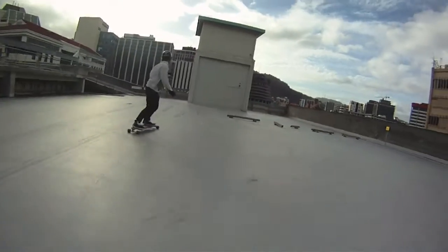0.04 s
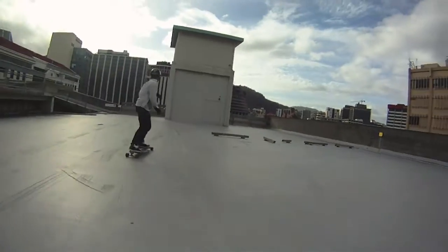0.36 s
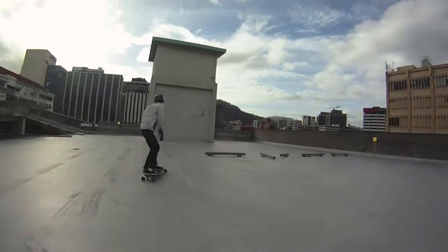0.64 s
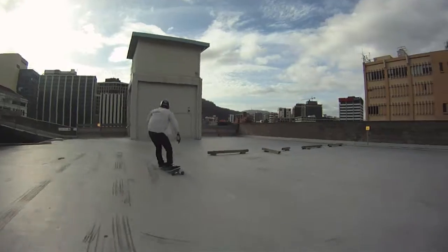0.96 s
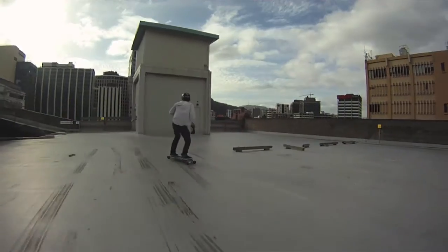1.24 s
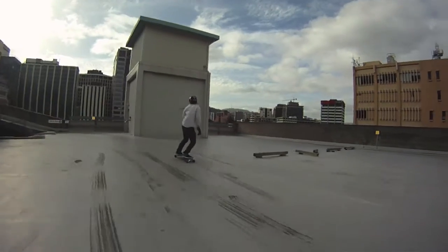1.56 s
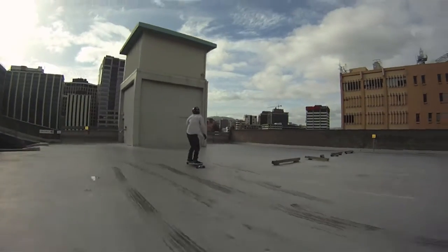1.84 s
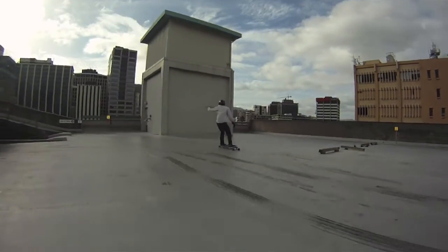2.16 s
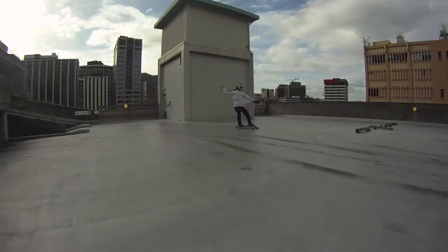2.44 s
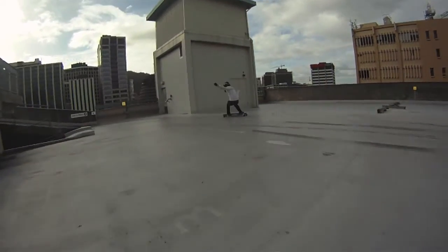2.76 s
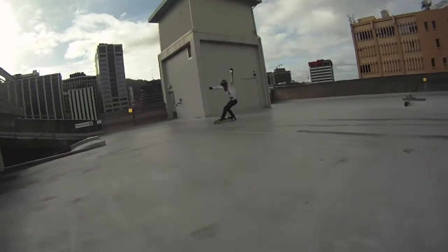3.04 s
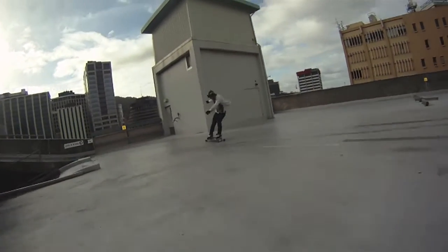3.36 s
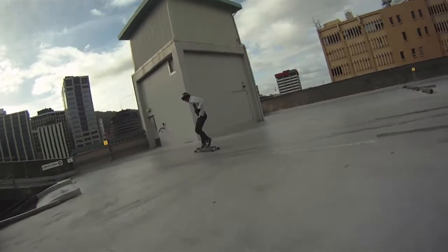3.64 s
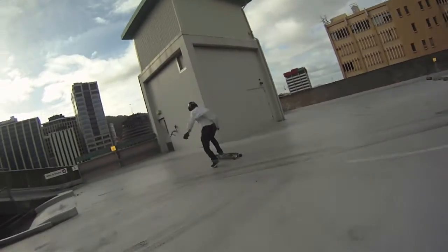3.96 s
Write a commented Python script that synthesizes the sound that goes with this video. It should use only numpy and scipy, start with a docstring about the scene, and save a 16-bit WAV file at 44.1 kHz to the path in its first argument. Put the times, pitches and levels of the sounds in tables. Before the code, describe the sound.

A skateboard rolls on smooth concrete with a steady rumble and gritty hiss, while wind buffets the following microphone. The board rattles briefly and the wheels hum during the first second. From about 2 seconds they scrub lightly, with a few faint knocks. At 3 seconds comes a loud sideways scrape with juddering and short squeals, fading by about 3.6 seconds into quieter rolling and a small knock.

```python
"""Longboard slide on a rooftop

A smooth concrete parking deck, heard in mono from a camera microphone riding behind on a second board.
The ground shakes the boards and rings the wheels into a rumble and hum, with grit hissing underneath.
The rider leans into a carve, then throws the board sideways at about 3 s: the urethane sticks and slips,
so it scrapes, chatters and briefly squeals before it grips again. Wind buffets the microphone."""
import sys
import numpy as np
from scipy import signal
from scipy.fft import rfft, irfft
from scipy.io import wavfile
from scipy.ndimage import uniform_filter1d

SR = 44100
rng = np.random.default_rng(int(sys.argv[2]) if len(sys.argv) > 2 else 0)


def wrap_up_sound(samples):
    """Save the sound to the file named by the first command line argument, as 16-bit audio."""
    columns = np.atleast_2d(samples).T
    # keep every value between -1 and 1, then stretch to whole-number steps
    tamed = np.clip(columns, -1, 1)
    steps = np.round(tamed * 32767).astype(np.int16)
    wavfile.write(sys.argv[1], SR, steps)


N = 176400
T = np.arange(N) / SR

# boards shaking on the concrete: (time [s], level [dB])
RUMBLE_LEVEL = [(0, -33.5), (.3, -30), (.55, -29), (.67, -30.5), (.8, -31.5), (1.05, -29), (1.3, -30.5),
                (1.46, -30), (1.68, -35), (1.9, -34), (2.05, -35.5), (2.2, -32), (2.4, -30.5), (2.65, -32),
                (2.85, -28), (2.96, -32), (3.1, -26.5), (3.3, -27), (3.4, -38.5), (3.65, -35), (4, -32)]
# tone of that rumble: (frequency [Hz], relative level [dB])
RUMBLE_TONE = [(40, -20), (75, -14), (100, -2.5), (130, 3.5), (165, 1), (225, -0.5), (265, -1), (325, -5.5),
               (380, -6), (445, -5), (540, -8.5), (650, -15), (900, -33), (2000, -45), (6000, -87)]
# hollow hum of the rolling wheels: (time [s], level [dB])
HUM_LEVEL = [(0, -31.5), (.45, -30), (.9, -34), (1.15, -35.5), (1.4, -39.5), (1.6, -35.5), (1.85, -33),
             (2.05, -38), (2.3, -37.5), (2.6, -38), (2.9, -39), (3.05, -35.5), (3.25, -25.5), (3.37, -30),
             (3.46, -27.5), (3.57, -34), (3.75, -36), (4, -35.5)]
# wheel resonances in the hum: (frequency [Hz], width [Hz], relative gain [dB])
WHEEL_MODES = [(436, 46, -5), (492.6, 52, -1.5), (546.7, 56, -3)]
# grit under the wheels: (time [s], level [dB])
HISS_LEVEL = [(0, -44.5), (.25, -46), (.55, -45), (1, -47), (1.15, -46), (1.7, -48), (2, -47), (3, -46),
              (3.55, -45), (3.72, -45), (3.85, -45.5), (4, -45.5)]
# tone of the grit: (frequency [Hz], relative level [dB])
HISS_TONE = [(300, -39), (650, 2.5), (800, 3.5), (1000, 1.5), (1270, 0), (1420, 1), (1650, 0.5),
             (1950, -3.5), (2250, -0.5), (2480, -1.5), (2850, 1.5), (3250, -0.5), (3550, -8), (3850, -6),
             (4300, -10), (4900, -8.5), (5300, -14), (5700, -20)]
# wheels singing on one note at speed: (time [s], level [dB])
SING_LEVEL = [(0, -32), (.15, -30), (.3, -30.5), (.38, -29.5), (.43, -24.5), (.52, -25.5), (.59, -31.5),
              (.65, -40), (.72, -29.5), (.79, -28.5), (.86, -29.5), (.93, -49), (1.2, -40), (1.5, -37),
              (1.85, -41), (2, -52), (3, -41), (3.18, -26.5), (3.25, -26.5), (3.32, -54), (4, -65)]
# drone of the flexing board: (time [s], level [dB])
DRONE_LEVEL = [(0, -39), (.6, -52), (.8, -35), (1.03, -31), (1.15, -32.5), (1.6, -34.5), (1.9, -34.5),
               (2.1, -39.5), (2.8, -35), (3.05, -36), (3.4, -36.5), (4, -51)]
# thin whirr of the bearings: (time [s], level [dB])
WHIRR_LEVEL = [(0, -57), (.7, -71), (.9, -51), (1.3, -67), (1.55, -54), (1.9, -55), (2.1, -59), (2.5, -59),
               (3, -49.5), (4, -53)]

# wheels scrubbing lightly in the carve: (time [s], level [dB])
SCRUB_LEVEL = [(0, -84), (1.9, -60), (2.15, -47.5), (2.3, -45), (2.45, -46), (2.65, -44.5), (2.85, -45),
               (3.03, -48.5), (3.15, -55), (4, -73)]
# wheel and truck resonances in the carve: (frequency [Hz], width [Hz], relative gain [dB])
CARVE_MODES = [(1260, 130, -1), (1626, 94, 2.5), (2125, 230, -0.5), (2746, 230, 1.5), (3150, 390, 0.5),
               (4900, 330, -11.5)]
# wheels scraping sideways in the slide: (time [s], level [dB])
SCRAPE_LEVEL = [(2.9, -75), (3.03, -45), (3.08, -31.5), (3.13, -32.5), (3.18, -29), (3.27, -28),
                (3.33, -29.5), (3.39, -33.5), (3.47, -31.5), (3.53, -37), (3.62, -50.5), (3.72, -41),
                (3.82, -58), (4, -66)]
# tone of urethane slipping on concrete: (frequency [Hz], relative level [dB])
SCRAPE_TONE = [(150, -19), (330, -7), (550, 6), (830, 2.5), (1100, -1.5), (1330, 5), (1520, 0), (1720, 2.5),
               (1920, -2), (2170, 5), (2480, 2.5), (2920, 7), (3300, 2), (3550, -3), (4000, -12.5),
               (4350, -10), (4850, -7.5), (5400, -12.5), (6000, -20)]
# tone of the board shaken by the slide: (frequency [Hz], relative level [dB])
SHAKE_TONE = [(60, -17), (118, 4), (160, -10.5), (205, -0.5), (270, 4), (320, -24), (600, -43), (3000, -80)]
# stick-slip of the sliding wheels: (time [s], rate [Hz], fundamental level [dB], octave level [dB])
CHATTER_TRACK = [(3.04, 245.6, -50, -41), (3.09, 243.7, -23, -35), (3.16, 245.3, -20, -30),
                 (3.2, 249.6, -37, -26), (3.247, 245.3, -24.5, -20.5), (3.285, 242.4, -23, -21),
                 (3.319, 242.9, -33, -24.5), (3.379, 222.6, -44, -31), (3.42, 214.6, -33, -21.5),
                 (3.46, 214.5, -29.5, -24.5), (3.5, 212.6, -30.5, -30), (3.6, 219, -35, -44),
                 (3.8, 220, -42, -48), (3.98, 213.5, -47, -55)]
# squeals of a single wheel: (centre time [s], half-length [s], pitch [Hz], level [dB])
WHEEL_SQUEALS = [(3.107, 0.08, 2087, -33.5), (3.212, 0.06, 814, -31.5), (3.19, 0.079, 2907, -31.5),
                 (3.286, 0.11, 1347, -36.5), (3.301, 0.17, 2730, -39), (3.455, 0.034, 885, -36.5)]

# the board rattling at the start: (time [s], level [dB])
RATTLE_LEVEL = [(0, -34), (.17, -32.5), (.32, -32), (.45, -39), (.6, -50), (1, -80)]
# resonances of board and hardware: (frequency [Hz], width [Hz], relative gain [dB])
HARDWARE_MODES = [(279, 74, -2.5), (680, 280, -16.5), (1580, 160, -22.5), (2270, 390, -33),
                  (2750, 120, -26)]
# knocks on the trucks: (time [s], relative level [dB])
TRUCK_KNOCKS = [(.16, -26), (.229, -31), (.298, -37), (2.008, -28), (2.335, -31), (2.437, -24),
                (3.918, -18.5)]
# truck resonances: (frequency [Hz], width [Hz], relative gain [dB])
TRUCK_MODES = [(1430, 420, -12), (2350, 310, -8), (2980, 310, -3.5)]
# single grains cracking under a wheel: (time [s], relative level [dB])
GRIT_CRACKS = [(.16, -44), (.81, -42), (1.65, -37.5), (1.741, -41)]
# gusts on the microphone: (time [s], relative level [dB])
WIND_LEVEL = [(0.0, -44), (0.31, -38), (0.37, -27.5), (0.42, -31.5), (0.56, -25), (0.58, -29.5),
              (0.72, -29.5), (0.77, -37.5), (1.08, -24), (1.11, -38), (1.22, -24.5), (1.26, -39),
              (1.37, -27), (1.4, -37), (1.46, -26.5), (1.55, -38), (1.6, -29), (1.7, -44), (1.96, -45),
              (2.03, -23), (2.1, -38.5), (2.21, -31.5), (2.24, -43), (2.37, -36), (2.41, -31),
              (2.49, -33.5), (2.55, -31.5), (2.62, -38), (2.87, -33.5), (2.9, -23), (2.96, -54),
              (3.01, -28.5), (3.45, -46.5), (3.84, -47), (3.87, -39), (4.0, -54)]
# tone of the buffeting: (frequency [Hz], relative level [dB])
WIND_TONE = [(15, 0), (28, -0.5), (55, 3), (85, 0.5), (130, -7), (220, -26.5), (500, -54), (3000, -95)]


def from_db(db):
    """Decibels to gain."""
    return 10 ** (np.asarray(db) / 20)


def rms_one(x):
    """Scale to rms 1."""
    return x / np.sqrt(np.mean(x ** 2) + 1e-20)


def level(rows):
    """Gain over time from (time [s], level [dB]) rows."""
    return from_db(np.interp(T, *np.transpose(rows)))


def drift(rate_hz):
    """Random wander of rms about 1, mostly slower than rate_hz."""
    step, settle = 40, 2000
    pole = np.exp(-2 * np.pi * rate_hz * step / SR)
    noise = rng.standard_normal(N // step + settle + 2)
    slow = signal.lfilter([1], [1, -2 * pole, pole * pole], noise)[settle:]
    return np.interp(np.arange(N) / step, np.arange(len(slow)), rms_one(slow))


def coloured(x, spectrum):
    """Filter x by (frequency [Hz], relative level [dB]) points; rms 1."""
    hz, db = np.transpose(spectrum)
    bins = np.maximum(np.fft.rfftfreq(N, 1 / SR), 1)
    gain = from_db(np.interp(np.log(bins), np.log(hz), db))
    return rms_one(irfft(rfft(x) * gain, N))


def steadied(x, span_s):
    """Even out the swells of x that are slower than span_s; rms about 1."""
    return x / np.sqrt(uniform_filter1d(x ** 2, int(span_s * SR)) + 1e-9)


def resonate(x, hz, width_hz):
    """One resonance with gain 1 at its peak."""
    r = np.exp(-np.pi * width_hz / SR)
    feedback = [1, -2 * r * np.cos(2 * np.pi * hz / SR), r * r]
    return signal.lfilter(np.array([1, 0, -1]) * (1 - r * r) / 2, feedback, x + 1e-18)


def body(x, modes):
    """Pass x through parallel resonances of alternating sign."""
    return sum((-1) ** k * from_db(db) * resonate(x, hz, width) for k, (hz, width, db) in enumerate(modes))


def note(hz, width_hz, span_s):
    """A steep-sided resonance kept ringing by the ground; rms about 1."""
    ring = resonate(rng.standard_normal(N), hz, width_hz)
    return steadied(resonate(ring, hz, 3 * width_hz), span_s)


def softened(x, hz):
    """Round off the treble, as a soft contact does."""
    return signal.sosfilt(signal.butter(4, hz, fs=SR, output="sos"), x)


def grains(per_s, spread_db):
    """Tiny impacts at random times; spread_db makes their sizes uneven."""
    sizes = from_db(spread_db * np.minimum(rng.exponential(1, N), 6)) * rng.choice([-1, 1], N)
    return sizes * (rng.random(N) < per_s / SR)


def bursts(rows, decay_s):
    """A dying burst of noise at each (time [s], level [dB]) row."""
    envelope = sum(from_db(db) * (T >= s) * np.exp(-np.abs(T - s) / decay_s) for s, db in rows)
    return envelope * rng.standard_normal(N)


def rolling():
    """The grain of the concrete shakes the boards and rings the wheels; grit hisses under them."""
    rumble = steadied(coloured(rng.standard_normal(N), RUMBLE_TONE), span_s=0.079)
    rings = sum(from_db(db) * resonate(rng.standard_normal(N), hz, width) for hz, width, db in WHEEL_MODES)
    hum = steadied(coloured(rings, [(200, 1), (400, -2), (600, -7), (800, -13), (4000, -68)]), span_s=0.1)
    hiss = coloured(grains(per_s=5000, spread_db=0), HISS_TONE)
    flutter = from_db(0.52 * drift(rate_hz=21))
    return level(RUMBLE_LEVEL) * rumble + level(HUM_LEVEL) * hum + level(HISS_LEVEL) * hiss * flutter


def slide_scrape():
    """Dense tiny slips of urethane on concrete; they also shake the board, most of all in the bass."""
    slips = grains(per_s=4000, spread_db=1) * from_db(0.84 * drift(rate_hz=32))
    shaking = steadied(coloured(rng.standard_normal(N), SHAKE_TONE), span_s=0.06)
    return level(SCRAPE_LEVEL) * (coloured(slips, SCRAPE_TONE) + shaking)


def slide_chatter():
    """The wheels stick and slip unevenly, more slowly as the board loses speed: a judder and its octave."""
    times, hz, *partial_dbs = np.transpose(CHATTER_TRACK)
    slip_hz = np.interp(T, times, hz) * (1 + 0.012 * drift(rate_hz=58))
    phase = 2 * np.pi * np.cumsum(slip_hz) / SR
    out = np.zeros(N)
    for harmonic, db in enumerate(partial_dbs, start=1):
        envelope = np.interp(T, times, from_db(db), left=0, right=0)
        flutter = from_db(2 * drift(rate_hz=32))
        out += envelope * flutter * np.sin(harmonic * phase)
    return out


def slide_squeals():
    """Now and then a sliding wheel locks on to one rough tone."""
    out = np.zeros(N)
    for centre_s, half_s, hz, db in WHEEL_SQUEALS:
        swell = np.cos(np.pi / 2 * np.clip((T - centre_s) / half_s, -1, 1)) ** 2
        gain = from_db(db + 2.5 * drift(rate_hz=35))
        pitch_hz = hz * (1 + 0.012 * drift(rate_hz=98.6))
        out += gain * swell * np.sin(2 * np.pi * np.cumsum(pitch_hz) / SR)
    return out


def ringing():
    """Wheels, board and bearings each ring at their own pitch."""
    wheels = level(SING_LEVEL) * note(hz=514, width_hz=20, span_s=0.056)
    board = level(DRONE_LEVEL) * note(hz=98.3, width_hz=7, span_s=0.19)
    bearings = level(WHIRR_LEVEL) * note(hz=1238, width_hz=85, span_s=0.15)
    return wheels + board + bearings


def carve_scrub():
    """Tiny slips in the carve ring the wheels and trucks."""
    rings = body(grains(per_s=2500, spread_db=2), CARVE_MODES)
    return level(SCRUB_LEVEL) * coloured(rings, [(3250, 0.5), (3700, -19), (4800, -3.5), (5800, 3)])


def board_rattle():
    """Quick uneven contacts shake the board and its hardware."""
    rings = body(grains(per_s=260, spread_db=3.2), HARDWARE_MODES)
    return level(RATTLE_LEVEL) * rms_one(softened(rings, hz=3400))


def truck_knocks():
    """Single knocks ring the trucks."""
    rings = body(bursts(TRUCK_KNOCKS, decay_s=0.006), TRUCK_MODES)
    return from_db(7.5) * softened(rings, hz=3700)


def grit_cracks():
    """Grains of grit crack brightly under a wheel."""
    cracks = resonate(bursts(GRIT_CRACKS, decay_s=0.004), hz=4520, width_hz=1600)
    return from_db(8.5) * softened(cracks, hz=5200)


def wind():
    """Air buffets the moving microphone in low, lumpy gusts."""
    buffeting = steadied(coloured(rng.standard_normal(N), WIND_TONE), span_s=0.063)
    return from_db(2) * level(WIND_LEVEL) * buffeting


def scene():
    """Wind right on the one microphone, and the board running ahead of it."""
    ride = wind() + rolling() + ringing() + board_rattle() + carve_scrub()
    slide = slide_scrape() + slide_chatter() + slide_squeals()
    return (ride + slide + truck_knocks() + grit_cracks())[None]


def record(dry):
    """The camera samples coarsely and holds each value, mirroring the sound into a gritty treble."""
    hold_hz, cutoff_hz = 12000, 15350
    coarse = signal.resample_poly(dry, hold_hz, SR, axis=1)
    held = np.repeat(coarse, 4, axis=1)
    gritty = signal.resample_poly(held, SR, 4 * hold_hz, axis=1)[:, :N]
    top_cut = signal.ellip(12, 0.2, 80, cutoff_hz, fs=SR, output="sos")
    return signal.sosfilt(top_cut, gritty)


dry = scene()
out = record(dry)
wrap_up_sound(out)
```